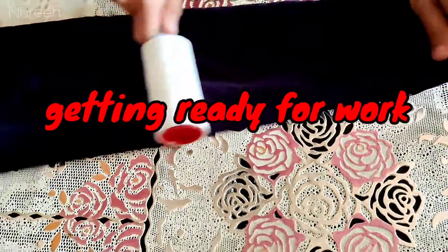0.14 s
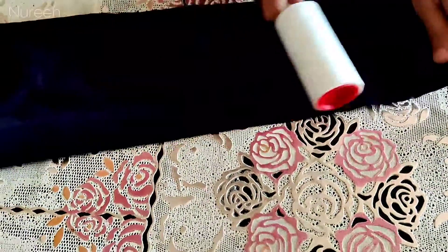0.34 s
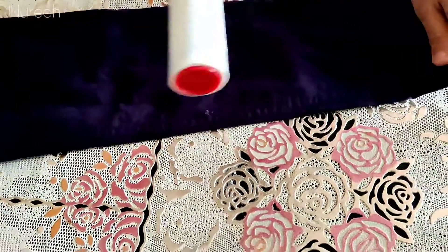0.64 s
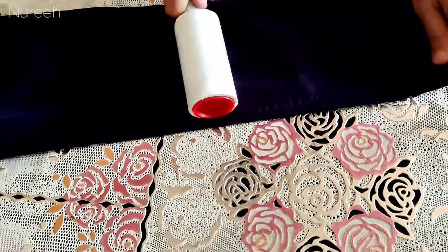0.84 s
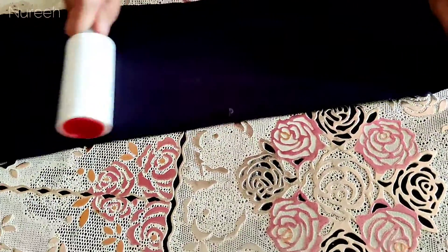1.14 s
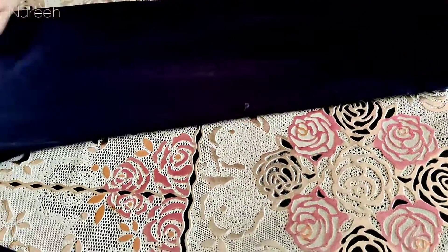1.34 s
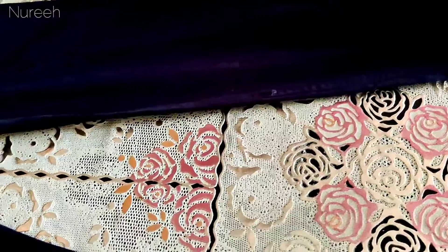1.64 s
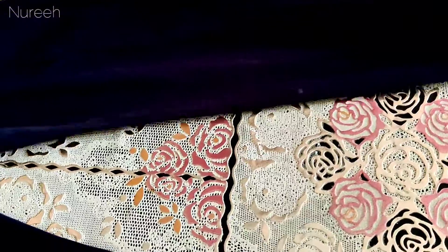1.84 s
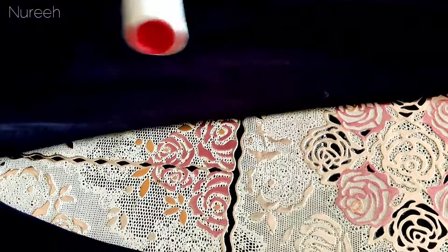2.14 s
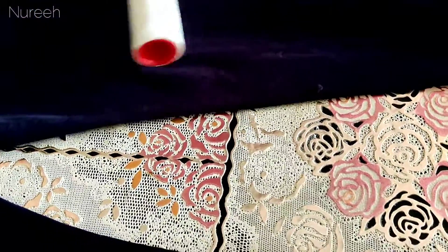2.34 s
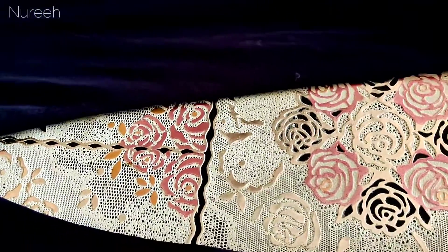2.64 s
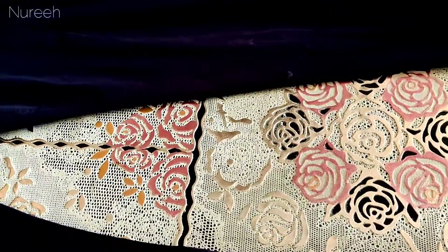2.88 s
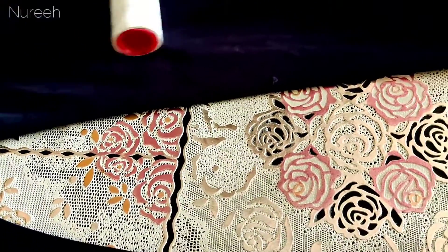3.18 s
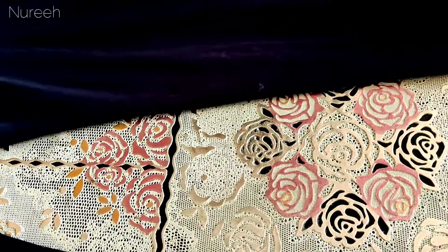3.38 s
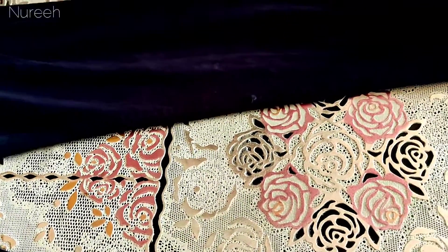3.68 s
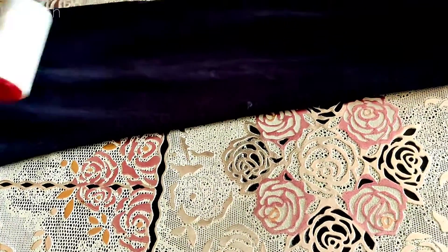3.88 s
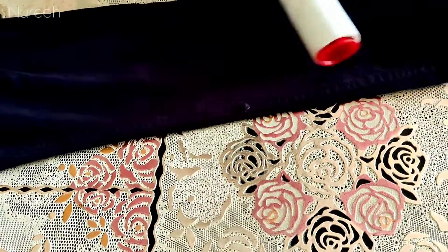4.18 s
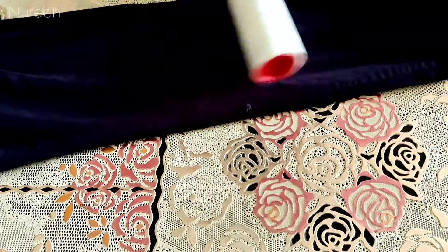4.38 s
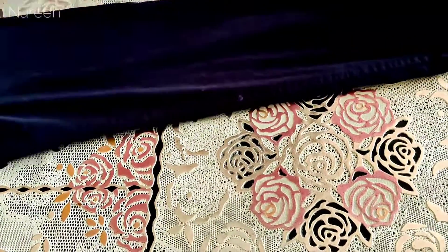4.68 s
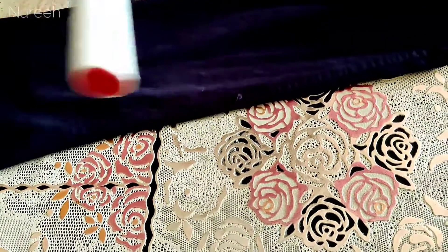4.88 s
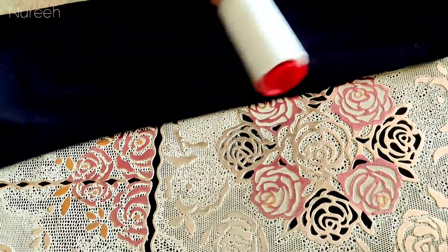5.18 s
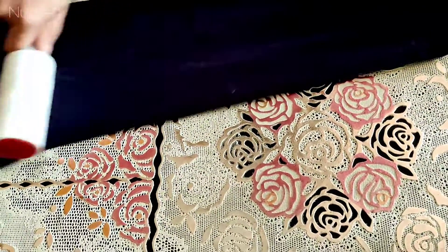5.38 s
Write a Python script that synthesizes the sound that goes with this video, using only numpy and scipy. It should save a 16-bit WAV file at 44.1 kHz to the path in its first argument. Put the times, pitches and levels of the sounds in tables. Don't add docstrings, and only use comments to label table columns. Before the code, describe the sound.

A close stereo scene in a quiet furnished room with low, boomy house tone. At 0-0.5 s two faint, short adhesive hisses pass over cloth, then tiny ticks and a faint squeak near 0.74. A soft thud at 0.97 leads into two linked strokes from 1.1 to 1.6, hissing over growing table rumble, ending in a strong hollow clack at 1.6. A hard thump lands at 2.34, followed by a long fading stroke at 2.46-2.79. Another hard thump at 3.24 precedes a brighter pull at 3.37-3.59, with a cluster of plastic knocks and a dull scuff around 3.65. A weak knock comes at 4.13 amid a very faint distant motor tone, then a soft landing at 4.33. The heaviest stroke, bumpy and rumbling, runs 4.5-4.77. A firm thud at 5.17 with tiny bright tearing crackles starts the last stroke, 5.31-5.58.

```python
import sys
import numpy as np
from scipy import signal
from scipy.fft import rfft, irfft, next_fast_len
from scipy.io import wavfile
from scipy.ndimage import uniform_filter1d, map_coordinates

SR = 44100
rng = np.random.default_rng(int(sys.argv[2]) if len(sys.argv) > 2 else 0)


def attenuation_scalar(level_db):
    decades = np.asarray(level_db, float) / 20
    return 10 ** decades


def log_audio(samples):
    frames = np.atleast_2d(samples).T
    limited = np.clip(frames, -1, 1)
    pcm = np.round(limited * 32767).astype(np.int16)
    wavfile.write(sys.argv[1], SR, pcm)


N = 243431

# start_s [s], peak_db [dB], contact_ms [ms], cloth puff_db [dB]
LANDINGS = [
    (0.972, -18, 1.5, -35),
    (2.3444, -8, 0.84, -38),
    (3.241, -8, 0.97, -41),
    (4.327, -19, 1.74, -43),
    (5.1673, -13, 1.14, -29),
]
# start_s [s], end_s [s], first_db [dB], last_db [dB], sizzle over hiss fine_db [dB]
STROKES = [
    (0.018, 0.283, -57.5, -58, -16.5),
    (0.309, 0.462, -57, -51.5, -15.5),
    (1.113, 1.291, -55.5, -51, -13),
    (1.322, 1.629, -51.5, -51, -15),
    (2.459, 2.787, -51.5, -53, -13.5),
    (3.367, 3.59, -50.5, -49, -13.5),
    (4.499, 4.767, -49.5, -48, -15.5),
    (5.313, 5.581, -50, -52, -15.5),
]


def unit(x):
    return x / np.sqrt(np.mean(x ** 2) + 1e-20)


def decibels(power):
    return 10 * np.log10(power + 1e-14)


def along(points, hz):
    f, v = np.transpose(points)
    return np.interp(np.log(hz + 1), np.log(f + 1), v)


def curves(rows):
    s, *cols = np.transpose(rows)
    return [np.interp(np.arange(N) / SR, s, c) for c in cols]


def wobble(rate):
    knots = rng.standard_normal(int(N * rate / SR) + 4)
    return map_coordinates(knots, [np.arange(N) * rate / SR])


def filtered(x, response):
    m = next_fast_len(N + SR // 2)
    return irfft(rfft(x, m) * response(np.fft.rfftfreq(m, 1 / SR)), m)[..., :N]


def coloured(x, spectrum):
    return unit(filtered(x, lambda hz: attenuation_scalar(along(spectrum, hz))))


def resonant(x, modes):
    def response(f):
        total = 0
        for k, (centre, width, db) in enumerate(modes):
            damping = 1j * f * width
            total = total + (-1) ** k * attenuation_scalar(db) * damping / (centre * centre - f * f + damping)
        return total
    return filtered(x, response)


def swell(start_s, end_s, first_db, last_db, rise, fall):
    times = [start_s - 9, start_s, end_s + 1e-6, end_s + 9]
    levels = [first_db - 9 * rise, first_db, last_db, last_db - 9 * fall]
    db = np.interp(np.arange(N) / SR, times, levels)
    return attenuation_scalar(2 * np.maximum(db, -200))


def lag_ms():
    # first_ms [ms], last_ms [ms]
    paths = [(-.3, -.12), (-.1, .05), (-.04, -.16), (-.18, -.3), (-.06, -.27), (-.13, -.31), (.07, -.25),
             (.05, -.3)]
    carry_s = 0.16
    aside_s, aside_ms = 4.1, -0.43
    knots = []
    for (start_s, end_s, *_), (first, last) in zip(STROKES, paths):
        knots += [(start_s, first), (end_s, last)]
    rests, landings = paths[1:2] + paths[3:], paths[2:3] + paths[4:]
    for (s, *_), (_, rest), (first, _) in zip(LANDINGS, rests, landings):
        knots += [(s - carry_s, rest), (s - 0.02, first)]
    knots = [(s, aside_ms if aside_s < s < aside_s + carry_s / 2 else ms) for s, ms in knots]
    knots += [(aside_s - carry_s, paths[5][1]), (aside_s, aside_ms)]
    return curves(sorted(knots))[0]


def placed(x):
    half_lag = lag_ms() * SR / 2000
    return np.array([map_coordinates(x, [np.arange(N) - side * half_lag], order=5) for side in (1, -1)])


def tail():
    # frequency_hz [Hz], t60_s [s]
    decay = [(100, 0.12), (300, 0.45), (800, 0.38), (2000, 0.33), (6000, 0.39), (12000, 0.064)]
    hz, t, z = signal.stft(rng.standard_normal((2, SR // 2)), SR, nperseg=256)
    h = signal.istft(z * attenuation_scalar(-60 * t / along(decay, hz)[:, None]), SR, nperseg=256)[1]
    gap = round(0.003807 * SR)
    return np.pad(h, ((0, 0), (gap, 0))) / np.linalg.norm(h[0])


def house():
    # frequency_hz [Hz], density_db [dB per Hz]
    quiet = [(35, -71), (60, -15), (91, 9), (142, -44), (180, 6.5), (202, -7.5), (249, -4.5), (446, -15),
             (762, -11), (1160, -21), (2690, -28), (3720, -31), (8030, -37.5), (15800, -32)]
    # frequency_hz [Hz], correlation [1]
    alike = [(60, 0.93), (180, 0.91), (550, 0.51), (1650, 0.035), (4970, 0.01), (15000, 0.06)]
    # time_s [s], level_db [dB]
    motor = [(3.9, -95), (3.96, -63), (4.1, -63), (4.3, -65), (4.45, -66), (4.52, -95)]
    # start_s [s], level_db [dB]
    boom_swells = [(0, -32.5), (.4, -42), (1.0, -37), (1.3, -39.5), (1.6, -37), (2.37, -34), (2.74, -38.5),
                   (3.26, -35.5), (3.53, -33.5), (4.35, -34), (4.6, -31), (4.8, -46), (5.2, -35), (5.42, -36.5)]

    def mid_side(hz):
        angle = np.arccos(np.clip(along(alike, hz), -1, 1)) / 2
        return attenuation_scalar(along(quiet, hz) - 25 * (hz > 12900)) * [np.cos(angle), np.sin(angle)]

    mid, side = filtered(rng.standard_normal((2, N)), mid_side)
    drift_db = 0.8 * wobble(4)
    tone = attenuation_scalar(-50 - 1.5 + drift_db) * unit(np.array([mid + side, mid - side]))

    low_mode = [(42.2, 16.4, 0)]  # Hz, width Hz, dB
    rise, fall, rest_db = 270, 50, -52.5
    boom_power = attenuation_scalar(2 * rest_db) + sum(swell(s, s, db, db, rise, fall) for s, db in boom_swells)
    air = resonant(resonant(rng.standard_normal(N), low_mode), low_mode)
    even = np.abs(uniform_filter1d(air ** 2, size=5000)) ** 0.3
    boom = np.sqrt(boom_power) * unit(air / even) * attenuation_scalar([[0.8], [-0.8]])

    phase = 2 * np.pi * 745 * np.arange(N) / SR + 0.25 * wobble(15)
    drone = attenuation_scalar(curves(motor)[0] + 3 + 1.5 * wobble(12)) * np.sin(phase)
    return tone + boom + drone


def snaps():
    # start_s [s], peak_db [dB], t60_s [s]
    tears = [
        (5.1764, -69, 0.012),
        (5.1896, -59, 0.0087),
        (5.2034, -52.5, 0.0091),
    ]
    t, x = np.arange(SR // 20) / SR, np.zeros(N + SR)
    for s, db, t60 in tears:
        x[round(s * SR):][:len(t)] += attenuation_scalar(db + 38 - 60 * t / t60) * rng.standard_normal(len(t))
    return placed(filtered(x[:N], lambda hz: hz > 11800))


def knocks():
    # start_s [s], peak_db [dB], ring_hz [Hz], ring_t60_s [s], crack_db [dB]
    handle_knocks = [(0.415, -45.5, 750, 0.021, -21), (0.445, -64, 804, 0.03, -3),
                     (0.605, -60, 835, 0.077, 3), (0.628, -48.5, 1150, 0.014, -7),
                     (0.972, -54, 890, 0.028, -6.5), (1.595, -18, 520, 0.008, -18),
                     (1.619, -37, 770, 0.11, -5.5), (1.653, -32.5, 806, 0.0094, -10),
                     (3.519, -40.5, 800, 0.013, -10), (3.642, -22.5, 1000, 0.011, -20),
                     (3.65, -28.5, 508, 0.018, -4), (3.66, -33.5, 700, 0.052, -5),
                     (3.696, -43.5, 767, 0.021, -2), (3.709, -48.5, 793.5, 0.18, -2),
                     (4.126, -43, 591, 0.16, -12), (4.133, -30.5, 664, 0.007, -16.5),
                     (4.326, -27.5, 990, 0.015, -5.5), (4.342, -47, 1040, 0.02, -3),
                     (4.579, -37, 435, 0.014, -25), (5.171, -23, 974, 0.0094, -11),
                     (5.186, -34, 980, 0.0088, -23), (5.313, -53, 560, 0.065, -9.5),
                     (5.458, -43.5, 583, 0.024, -26)]
    # start_s [s], peak_db [dB], ring_hz [Hz], ring_t60_s [s], crack_db [dB]
    further_knocks = [(0.9669, -61, 2290, 0.027, 7), (0.9731, -55, 870, 0.016, -11), (1.5901, -26, 910, 0.012, -23),
                      (1.742, -42, 700, 0.022, -18), (2.341, -45, 1150, 0.016, -7),
                      (2.3432, -30.5, 480, 0.0089, -28), (2.374, -41, 539, 0.012, -36),
                      (3.24, -52, 974, 0.024, -33), (3.2405, -29.5, 555, 0.0032, -30),
                      (4.128, -46, 321, 0.074, -17), (4.146, -44, 575, 0.06, -25), (5.177, -32.5, 618, 0.017, -13)]
    # start_s [s], peak_db [dB], pitch_hz [Hz], t60_s [s]
    squeaks = [
        (.736, -56, 2490, 0.021),
        (.747, -53, 2540, 0.0095),
        (0.746, -60, 2920, 0.014),
    ]
    # centre_hz [Hz], width_hz [Hz], level_db [dB]
    tube_modes = [(550, 130, 8), (770, 200, 3.5), (1040, 67, 2), (1667, 304, 6.5), (2740, 410, 2),
                  (3830, 3900, -16), (6500, 7600, -42.5)]
    delay_s = 0.0012
    wet_db, wet_db_per_ms = -7, 15.5

    t = np.arange(SR // 8) / SR
    near, far = np.zeros(N + SR), np.zeros((2, N + SR))
    crack = resonant(np.eye(1, N)[0], tube_modes)[:len(t)]
    crack = crack / np.abs(crack).max()
    lag = lag_ms()
    contacts = [(s + delay_s, *row) for s, *row in handle_knocks] + further_knocks
    contacts += [(*row, -40) for row in squeaks]
    for s, db, hz, t60, crack_db in contacts:
        start = round(s * SR)
        ring = -np.sin(2 * np.pi * hz * t) * attenuation_scalar(-60 * t / t60) * (1 - np.exp(-t / 0.0008))
        hit = attenuation_scalar(db + 14.5) * (ring + attenuation_scalar(crack_db) * crack)
        near[start:][:len(t)] += hit
        wet = attenuation_scalar(wet_db - wet_db_per_ms * max(lag[start], -0.3))
        answer = wet * signal.fftconvolve(hit[None], tail(), axes=1)
        far[:, start:][:, :answer.shape[1]] += answer
    return placed(near[:N]) + far[:, :N]


def pressure():
    # start_s [s], end_s [s], first_db [dB], last_db [dB]
    presses = [
        (.05, 0.453, -50.5, -52.5),
        (1.157, 1.632, -45, -39),
        (2.526, 2.717, -37, -42.5),
        (3.377, 3.69, -35.5, -37.5),
        (4.538, 4.755, -31.5, -29.5),
        (5.348, 5.608, -33, -28.5),
    ]
    rise, fall, tremor_db = 196, 156, -57
    aftershake_db, aftershake_fall = -16.5, 153
    power = attenuation_scalar(2 * tremor_db) + sum(swell(*row, rise, fall) for row in presses)
    for s, peak_db, *_ in LANDINGS:
        db = peak_db + aftershake_db
        power = power + swell(s, s, db, db, 3000, aftershake_fall)
    return np.sqrt(power)


def table():
    # centre_hz [Hz], width_hz [Hz], level_db [dB]
    top_modes = [(44.6, 6.3, -7), (86, 7.3, 7), (112.5, 9.1, 1.5), (162.4, 9.4, -2), (211.2, 8.9, -8.5),
                 (266.8, 16, -8), (347.5, 49, -14), (525, 240, -22)]
    # start_s [s], peak_db [dB]
    folds = [(1.39, -24), (2.56, -23), (3.517, -28), (3.582, -24.5), (4.51, -38), (4.549, -20),
             (4.584, -22), (4.605, -25), (4.651, -31), (4.72, -20), (5.342, -32), (5.401, -23),
             (5.439, -19), (5.462, -35)]
    fold_ms, fold_puff_db = 1.26, -60
    t = np.arange(-300, 1500) / SR
    blows, puffs = np.zeros(N + SR), np.zeros(N + SR)
    for s, db, contact_ms, puff_db in LANDINGS + [(*row, fold_ms, fold_puff_db) for row in folds]:
        start = round(s * SR) - 300
        u = t / (contact_ms / 1000)
        push = (u + 0.14) * np.exp(-u * u / (2 + 0.37 * np.clip(u / 2, 0, 1)))
        blows[start:][:len(t)] += attenuation_scalar(db - 1) * push
        puff = attenuation_scalar(db + puff_db - 60 * np.abs(t) / 0.02) * (u > -1)
        puffs[start:][:len(t)] += puff * rng.standard_normal(len(t))

    grains = rng.standard_normal(N) * attenuation_scalar(4.5 * wobble(45))
    shake = resonant(resonant(grains, [(183.7, 140, 0)]), top_modes)
    steady = np.abs(uniform_filter1d(shake ** 2, size=3500)) ** 0.3
    rumble = pressure() * unit(shake / steady)

    top = attenuation_scalar(-10) * resonant(blows[:N], top_modes)
    answer = signal.fftconvolve(blows[None], tail(), axes=1)[:, :N]
    answer = np.array([[0.9, 0.062], [0.9, -0.46]]) @ answer
    return blows[:N] + top + attenuation_scalar(-7) * answer + rumble + placed(puffs[:N])


def glue():
    # start_s [s], lasts_s [s], hiss_db [dB], fine_db over hiss [dB]
    lifts = [(.6, 0.016, -60.5, -14), (.69, 0.02, -63, -23), (1.05, .03, -67, -23),
             (1.74, 0.026, -62.5, -22), (1.88, 0.07, -67.5, -28), (2.01, 0.036, -65, -18),
             (2.995, 0.019, -57.5, -14), (3.07, 0.064, -72.5, -14.5), (3.79, 0.077, -61, -15.5),
             (4.295, 0.015, -66.5, -27), (4.915, .04, -59, -17.5), (5.0, 0.037, -65, -25),
             (5.14, 0.026, -68.5, -24)]
    # start_s [s], lasts_s [s], hiss_db [dB], fine_db over hiss [dB]
    scuffs = [
        (.968, .008, -63.5, -25),
        (2.344, .008, -59, -14),
        (3.241, .008, -58, -24),
        (3.645, .012, -43, -32),
        (4.128, .012, -68, -29),
        (4.327, .013, -49.5, -27),
        (5.173, .035, -56, -9.5),
    ]
    parts = [(swell(*row, 242, 202), fine_db) for *row, fine_db in STROKES]
    for rows, rise, fall in ((lifts, 236, 201), (scuffs, 3005, 1509)):
        for s, lasts, db, fine_db in rows:
            parts.append((swell(s, s + abs(lasts), db, db, rise, fall), fine_db))
    hiss_db = decibels(sum(power for power, _ in parts))
    sizzle_db = decibels(sum(power * attenuation_scalar(2 * fine_db) for power, fine_db in parts))
    return hiss_db, sizzle_db - hiss_db


def patchy(x, depth_db):
    z = signal.stft(x, nperseg=256)[2]
    field = uniform_filter1d(rng.standard_normal(z.shape[-2:]), size=4, axis=0)
    field = uniform_filter1d(field, size=12, axis=1)
    return signal.istft(z * attenuation_scalar(depth_db * unit(field)), nperseg=256)[1][..., :N]


def peel():
    # frequency_hz [Hz], density_db [dB per Hz]
    hiss = [(240, -10), (400, 0.5), (528, -4), (680, 3.5), (1080, -3.5), (1270, -3), (1550, -2.5),
            (3420, -3.5), (4070, -3.5), (6220, -3.5), (7290, -7.5), (9500, -60.5), (12400, -99),
            (20900, -120)]
    # frequency_hz [Hz], density_db [dB per Hz]
    sizzle = [(5000, -30.5), (8500, -22), (9850, -21.5), (11500, -21), (14200, -20.5), (15800, -16)]
    hiss_db, sizzle_db = glue()

    def shaped(x, fine_db):
        return 1.212 * coloured(x, hiss) + attenuation_scalar(sizzle_db + fine_db) * coloured(x, sizzle)

    threads = patchy(rng.standard_normal(N) * attenuation_scalar(2.5 * rng.standard_normal(N)), depth_db=1.6)
    grip = attenuation_scalar(hiss_db + 0.5 * wobble(14) + 1.2 * wobble(40))
    direct = placed(grip * shaped(threads, fine_db=16.5))

    keep = attenuation_scalar(-120 / (0.24 * SR))
    late = np.sqrt(signal.lfilter([1 - keep], [1, -keep], grip ** 2))
    diffuse = patchy(rng.standard_normal((2, N)), depth_db=3.14)
    return direct + attenuation_scalar(-0.5) * late * shaped(diffuse, fine_db=19.5)


def scene():
    return house() + snaps() + knocks() + table() + peel()


def band_limit(x):
    return signal.sosfilt(signal.butter(12, 15960, fs=SR, output="sos"), x)


def record(dry):
    # frequency_hz [Hz], gain_db [dB]
    shared = [(7600, -1), (8300, -6), (9000, -15), (9700, -15), (15350, -21), (15550, -71)]
    # frequency_hz [Hz], difference_db [dB]
    difference = [(300, 0.5), (900, 1), (3000, 0), (6200, 0.5), (7200, -7), (8200, 2.5), (12000, -1)]
    mix = filtered(dry, lambda hz: attenuation_scalar(along(shared, hz) + np.outer([0.5, -0.5], along(difference, hz))))
    return band_limit(mix)


dry = scene()
out = record(dry)
log_audio(out)
```